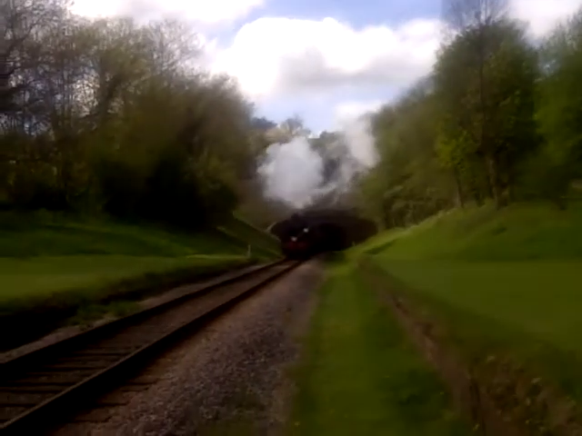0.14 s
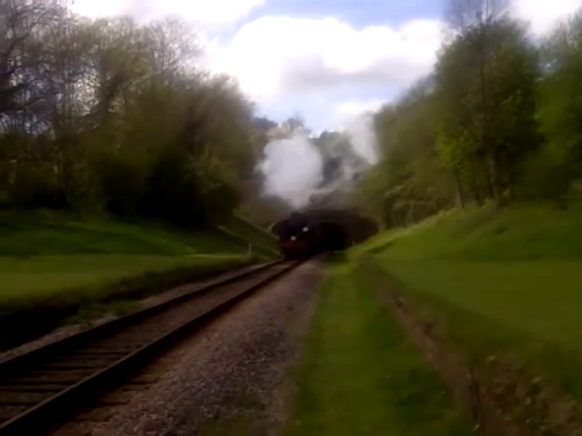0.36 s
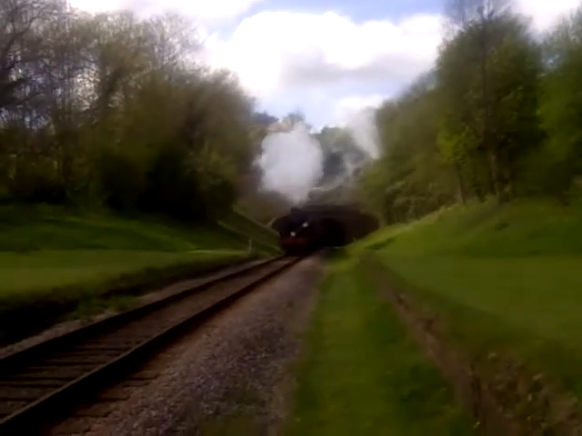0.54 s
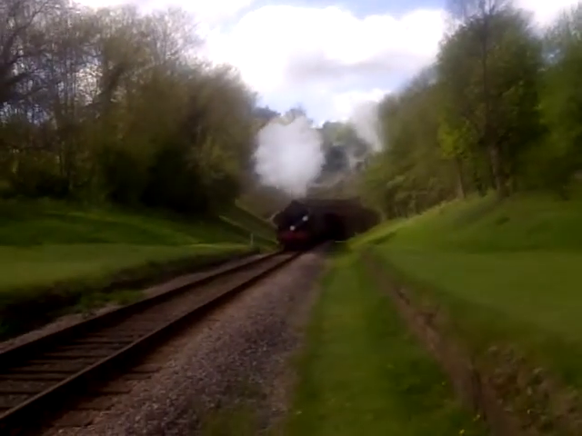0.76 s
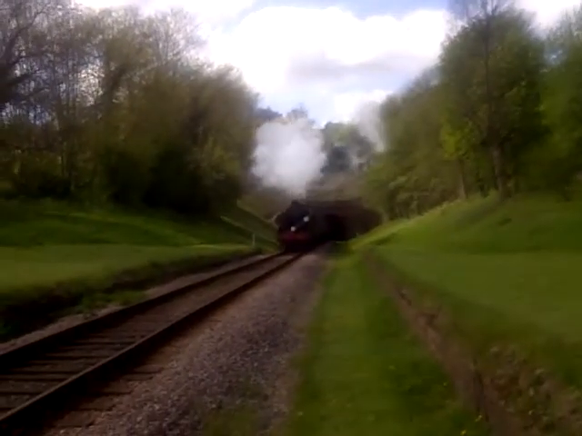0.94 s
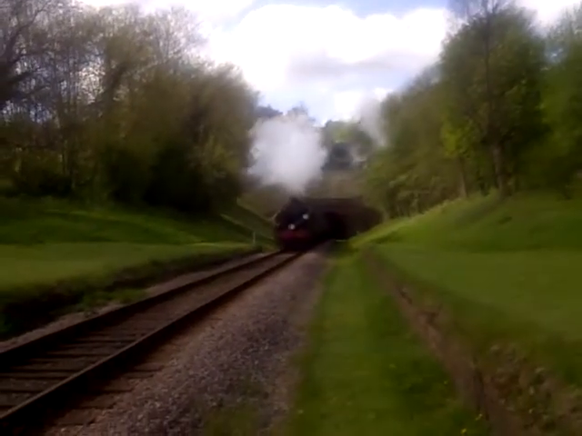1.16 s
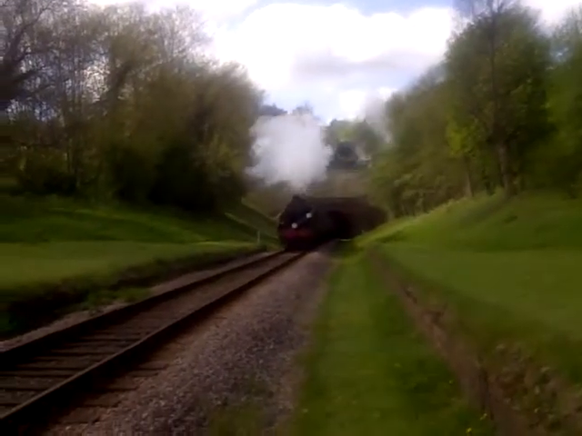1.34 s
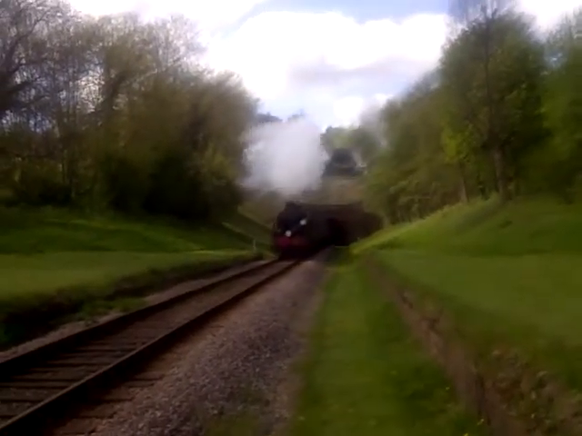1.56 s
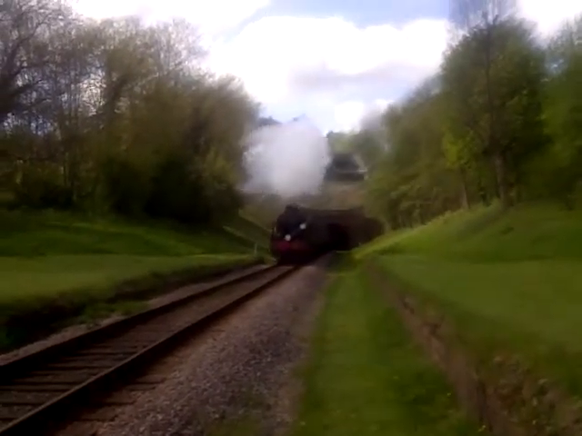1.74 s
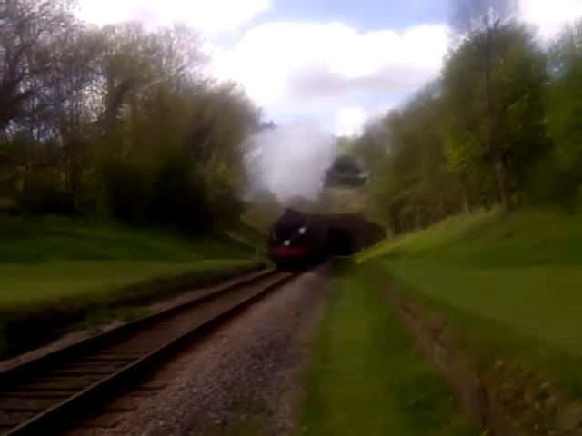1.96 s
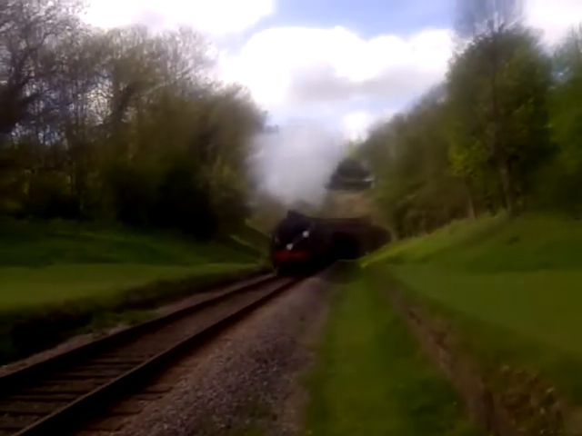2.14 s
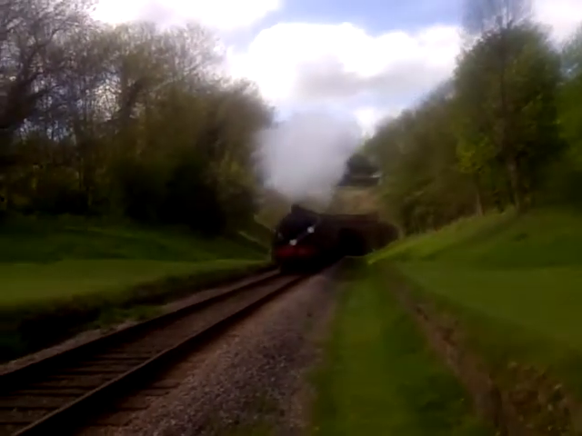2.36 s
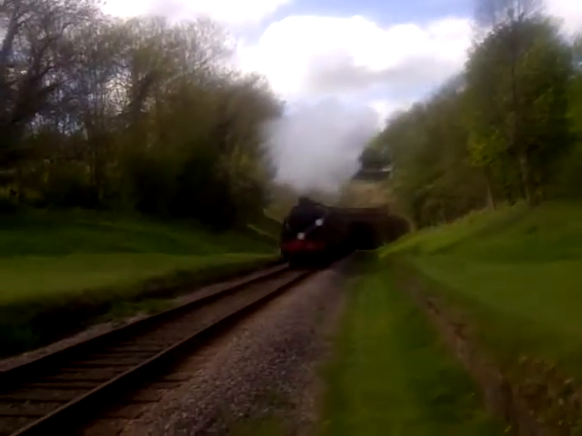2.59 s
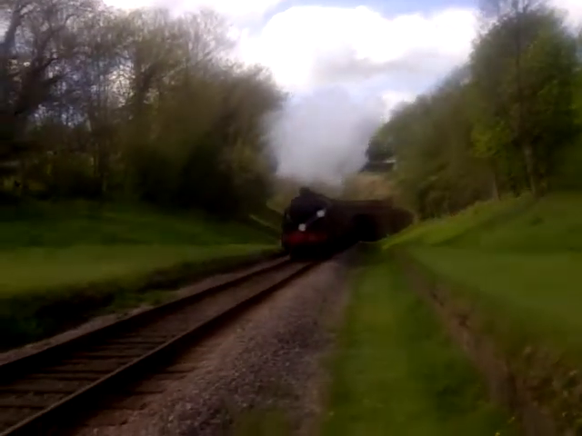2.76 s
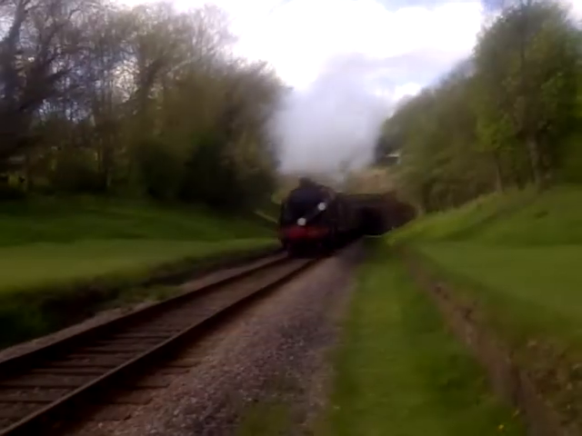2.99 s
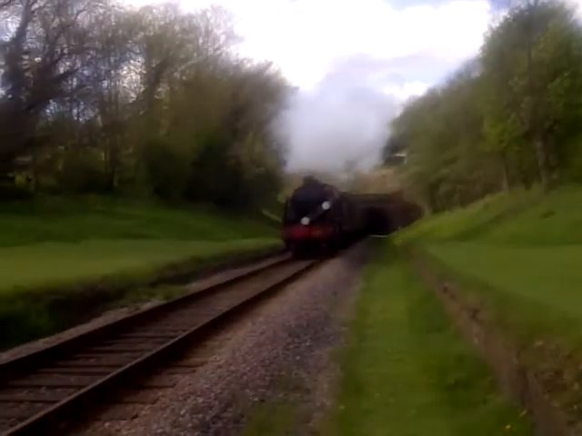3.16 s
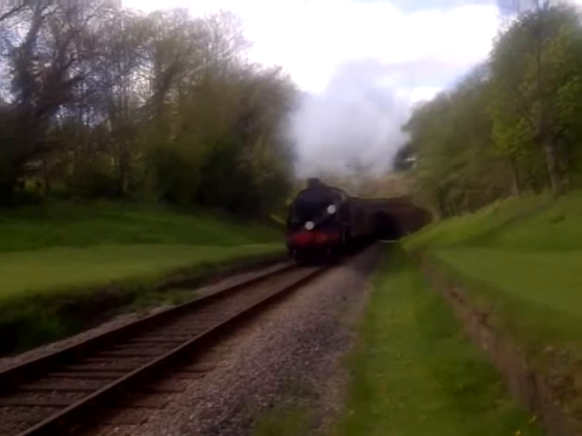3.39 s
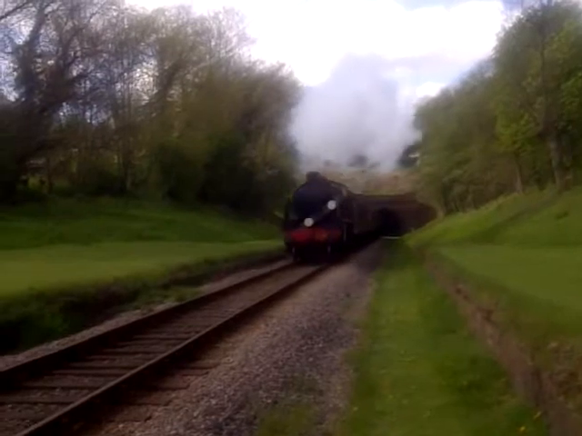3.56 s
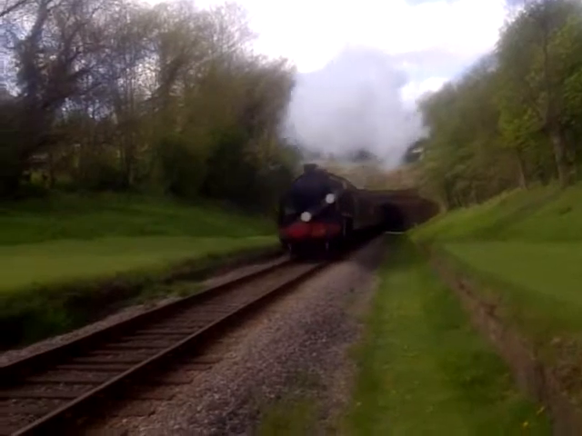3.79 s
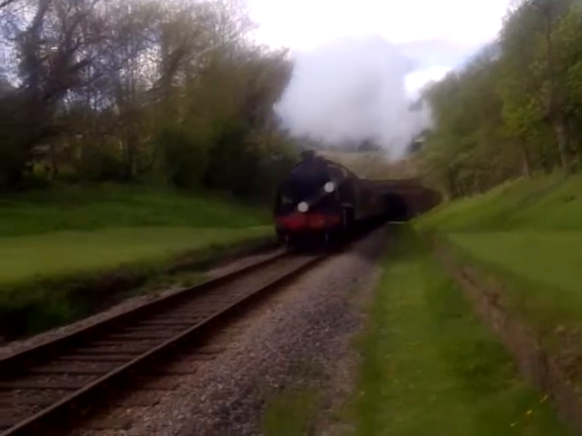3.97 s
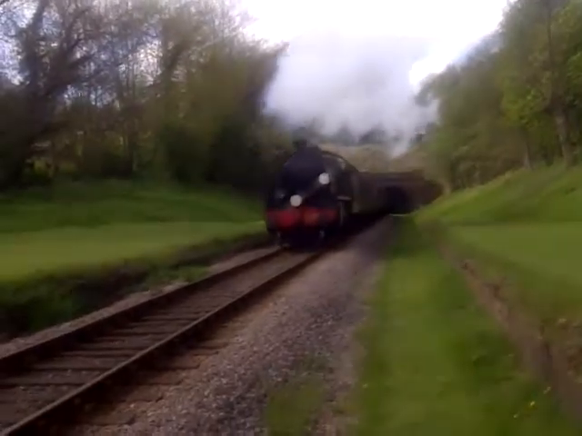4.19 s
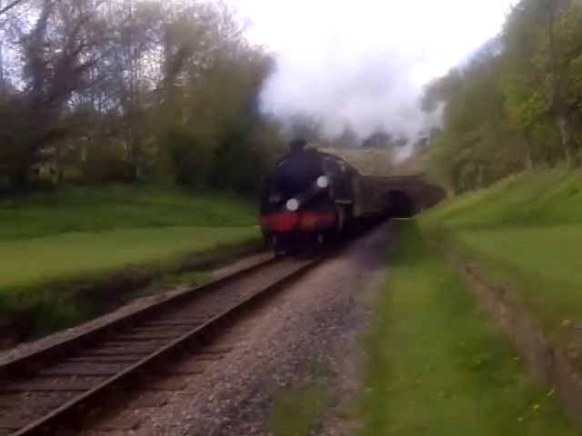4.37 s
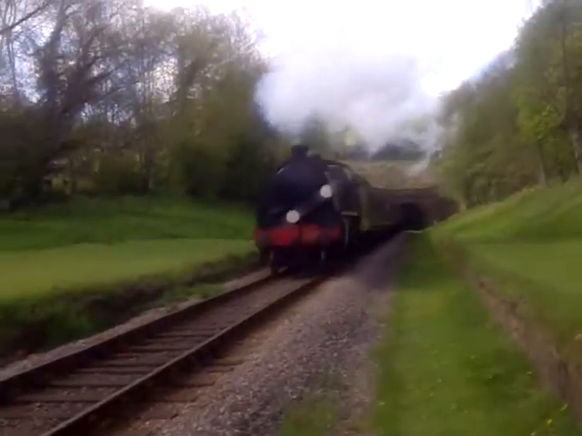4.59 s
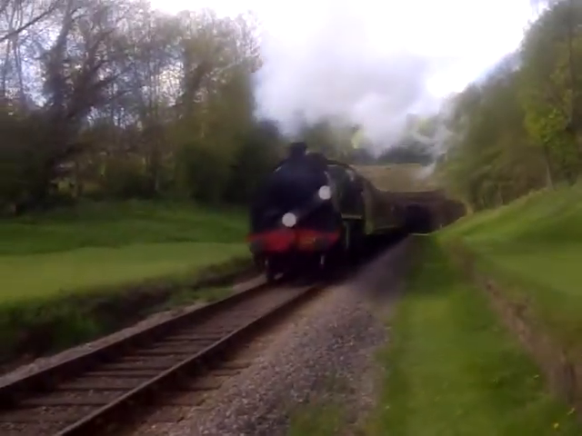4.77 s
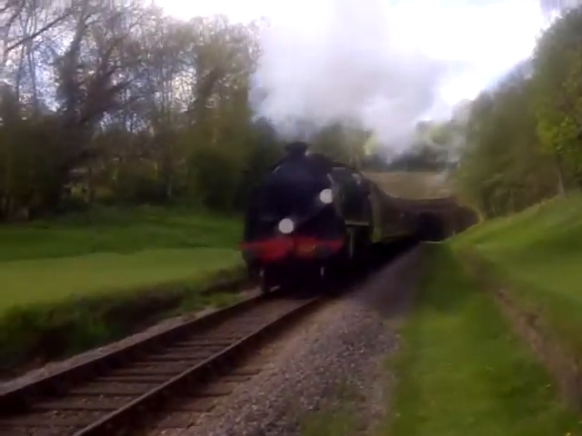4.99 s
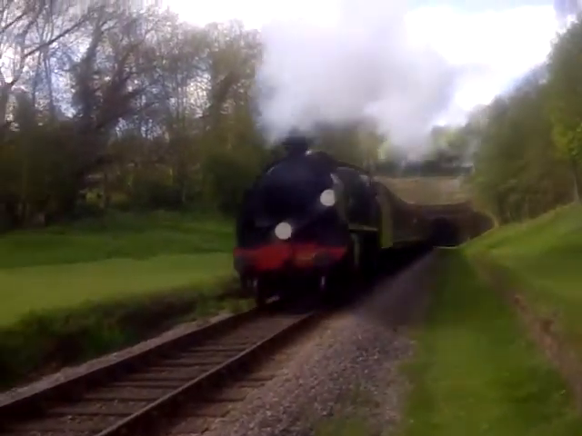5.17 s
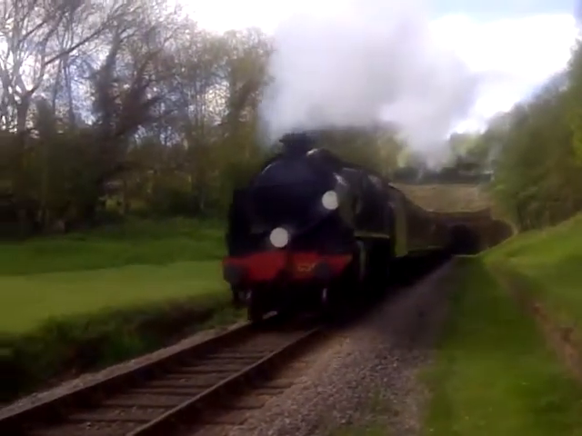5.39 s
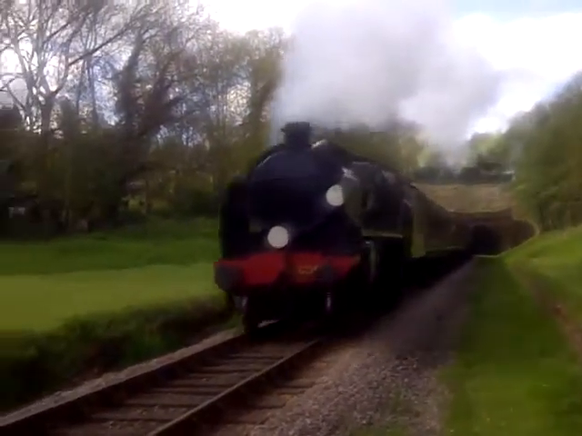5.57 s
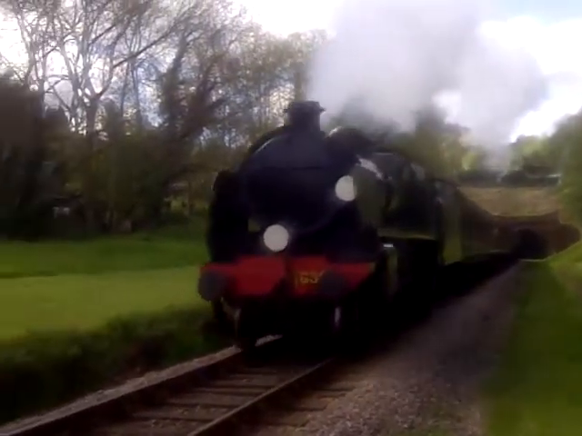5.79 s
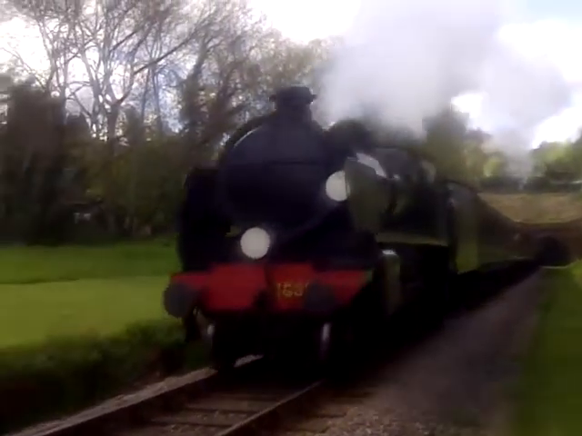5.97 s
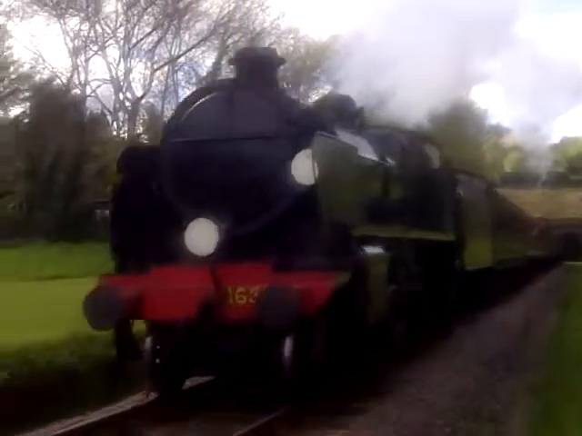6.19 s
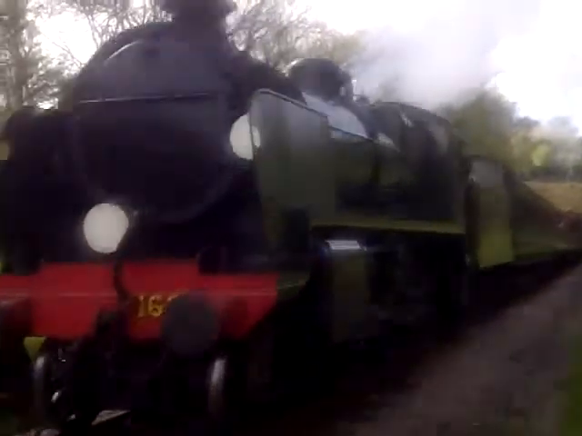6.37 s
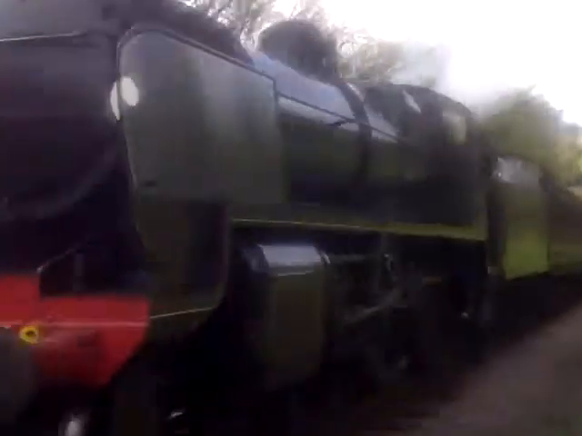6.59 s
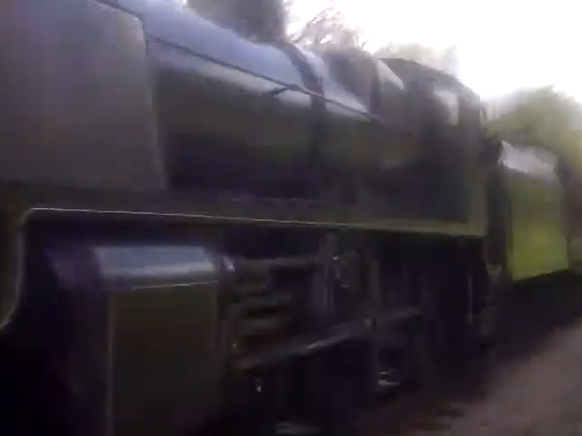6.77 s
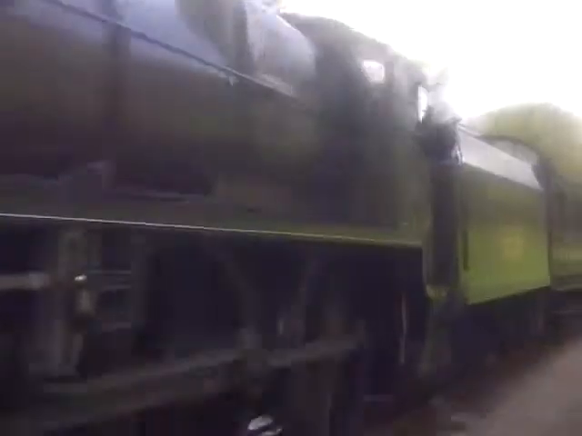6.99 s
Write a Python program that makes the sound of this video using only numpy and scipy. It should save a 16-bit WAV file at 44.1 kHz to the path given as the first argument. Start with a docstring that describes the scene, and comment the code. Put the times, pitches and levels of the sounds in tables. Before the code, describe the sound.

Quick, even steam engine chuffs approach and fade, giving way to metallic knocks, hiss and a rising rumble of wheels.

```python
"""A grassy railway cutting, where a two-cylinder steam locomotive works up toward a trackside listener.
Each exhaust blast, four to a wheel turn, is a turbulent jet that excites the chimney's air column; the
ground and banks reflect it. Steam is shut off and the beats fade. The engine coasts, steel knocking
on steel, and arrives in a swelling roar of wheels and steam. A few small sharp clicks sound close by."""
import sys
import numpy as np
from scipy import signal
from scipy.fft import rfft, irfft, next_fast_len
from scipy.io import wavfile
from scipy.ndimage import uniform_filter1d, map_coordinates

SR = 44100
rng = np.random.default_rng(int(sys.argv[2]) if len(sys.argv) > 2 else 0)


def persist_wave(psi):
    """Save psi, clipped to +-1, as 16-bit WAV."""
    counts = np.round(np.clip(psi, -1, 1) * 32767).astype(np.int16)
    wavfile.write(sys.argv[1], SR, np.atleast_2d(counts).T)


N = 310464


def amp(db):
    """Amplitude ratio of a level in decibels."""
    return 10 ** (np.asarray(db) / 20)


def unit(x):
    """Normalisation to rms 1."""
    return x / np.sqrt(np.mean(x ** 2) + 1e-20)


def along(points, hz):
    """Interpolation of (frequency, value) points on a logarithmic frequency axis."""
    f, v = np.transpose(points)
    return np.interp(np.log(hz + 1), np.log(f + 1), v)


def curves(rows):
    """Linear interpolation in time: one value per sample for each column after the first."""
    times, *columns = np.transpose(rows)
    return [np.interp(np.arange(N) / SR, times, column) for column in columns]


def wobble(rate):
    """Smooth random modulation: a spline through rate Gaussian knots a second."""
    return map_coordinates(rng.standard_normal(int(N * rate / SR) + 4), [np.arange(N) * rate / SR])


def filtered(x, response):
    """Linear filtering: the spectrum of x times a complex frequency response."""
    size = next_fast_len(N + SR // 2)
    return irfft(rfft(x, size) * response(np.fft.rfftfreq(size, 1 / SR)), size)[:N]


def noise(spectrum):
    """Spectral shaping of white noise, normalised to rms 1."""
    return unit(filtered(rng.standard_normal(N), lambda hz: amp(along(spectrum, hz))))


def resonance(f, hz, width):
    """Causal frequency response of one damped mode."""
    return 1j * f * width / (hz * hz - f * f + 1j * f * width)


def swell(t, rise, shape):
    """Gamma envelope: growth to 1 at the rise time, then a near-exponential decay."""
    u = t / rise
    return (u * np.exp(1 - u)) ** shape


def add(track, start_s, sound):
    """Superposition of a sound on a track from a given time."""
    part = track[max(round(start_s * SR), 0):][:len(sound)]
    part += sound[:len(part)]


# relative levels of the rolling train: (time [s], rumble [dB], wheel roar [dB], steam hiss [dB])
ROLLING_LEVELS = [(0.0, -54, -37.5, -60), (0.47, -52.5, -42, -57), (0.86, -48.5, -40, -60),
                  (1.9, -47, -39, -54.5), (3.82, -45, -37, -54.5), (4.38, -43.5, -35.5, -49),
                  (4.6, -45, -35.5, -51.5), (5.06, -45.5, -36, -53.5), (5.15, -45.5, -38, -54),
                  (5.38, -48, -39.5, -55), (5.47, -45.5, -35, -51.5), (5.76, -46.5, -37, -48.5),
                  (5.98, -44, -32, -49.5), (6.27, -44, -30.5, -46.5), (6.44, -42, -27.5, -45),
                  (6.63, -44, -27.5, -40.5), (6.7, -44, -22, -39.5), (6.75, -38, -31, -37),
                  (6.79, -42, -23, -38.5), (7.0, -43, -22, -37)]
# spectra of far and near wheels, rumble, steam, fine spray and fizz: (frequency [Hz], relative level [dB])
WHEELS_FAR = [(100, -30.5), (210, 10), (300, -1.5), (400, 5.5), (520, 0.5), (700, 0.5), (850, 4.5),
              (1120, 0), (1320, 3), (1700, -1), (2400, -9.5), (3200, -27), (8000, -65.5)]
WHEELS_NEAR = [(80, -29.5), (140, -1), (240, -1), (450, 1), (700, -2), (950, -5.5), (1130, -6.5),
               (1350, -8), (1700, -8.5), (2400, -12), (3200, -32.5), (8000, -60)]
RUMBLE_SPECTRUM = [(15, -22.5), (30, -9.5), (65, -1), (90, -2.5), (130, 1.5), (200, -0.5), (300, -7),
                   (600, -63.5), (2000, -120)]
STEAM_SPECTRUM = [(1500, -36.5), (2500, 9.5), (3100, 10.5), (3800, 5), (4400, 3), (5300, -3), (6200, -15),
                  (7000, -38.5), (8000, -69)]
SPRAY_SPECTRUM = [(3500, -22.5), (5500, 2.5), (6800, -1), (7400, -24), (8000, -44.5)]
FIZZ_SPECTRUM = [(2500, -26), (4200, 6), (6000, -4.5), (7200, -20)]
def rolling(arrival_s=6.37, spread_s=0.45):
    """Broadband rolling and steam noise: close up the roar fills out, steel rings and fine hiss arrives."""
    rumble_db, roar_db, hiss_db = curves(ROLLING_LEVELS)
    near = 0.038 + 0.87 / (1 + np.exp((arrival_s - np.arange(N) / SR) / spread_s))
    ring = amp(-13.5 + 10 * near) * unit(steel_modes(rng.standard_normal(N)))
    wheels = np.sqrt(1 - near) * noise(WHEELS_FAR) + np.sqrt(near) * noise(WHEELS_NEAR) + ring
    roar = amp(roar_db - 0.5 + 0.87 * wobble(45)) * wheels
    rumble = amp(rumble_db + 7 + 2.1 * wobble(9.2)) * noise(RUMBLE_SPECTRUM)
    hiss_gain = amp(hiss_db - 0.4 + 1.4 * wobble(25))
    steam = noise(STEAM_SPECTRUM) + amp(-10) * near ** 2 * noise(SPRAY_SPECTRUM)
    fizz = amp(-73 + 4.5 * wobble(30)) * noise(FIZZ_SPECTRUM)  # flickers out of step with the beats
    return roar + rumble + hiss_gain * steam + fizz


# modes of wheels and rails: (frequency [Hz], bandwidth of each resonator [Hz], gain [dB])
STEEL_MODES = [(420, 130, -11.5), (588, 49, -0.5), (953, 110, -2.5), (1293, 99, 1), (1337, 67, 0.5),
               (1460, 84, -3.5), (2152, 52, -4.5), (2570, 7.8, -11.5), (3355, 55, -23.5), (3590, 50, -25.5),
               (4350, 39, -16.5), (5440, 27, -22.5)]
def steel_modes(force):
    """Forced vibration of wheels and rails: a sum of modes, each two resonators in cascade."""
    def response(f):
        return sum(amp(db) * resonance(f, hz, width) ** 2 for hz, width, db in STEEL_MODES)
    return filtered(force, response)


# exhaust beats, the last ones fading as steam is shut off:
# (time [s], rise time [s], bark level [dB], boom level [dB], boom frequency [Hz])
EXHAUST_BEATS = [(.058, .026, -36.5, -49, 217), (.186, 0.019, -31, -48, 192.4),
                 (.324, 0.021, -33.5, -47, 187), (.442, .025, -34, -34.5, 229.5),
                 (.56, .018, -33.5, -34.5, 216.4), (.677, 0.026, -30.5, -36.5, 217),
                 (.818, 0.024, -34, -33.5, 200.4), (.935, 0.025, -33, -34.5, 213),
                 (1.05, 0.024, -34, -41, 243), (1.172, .018, -31, -39.5, 229.5),
                 (1.308, 0.022, -32, -32.5, 223), (1.422, 0.029, -35.5, -35, 211.5),
                 (1.54, 0.026, -36, -46, 210), (1.657, 0.029, -31.5, -31, 211.5),
                 (1.793, 0.023, -31.5, -33.5, 218), (1.917, 0.021, -31, -31.5, 207),
                 (2.03, 0.02, -34.5, -31.5, 223), (2.151, .011, -26.5, -29, 226),
                 (2.281, 0.026, -32.5, -33, 218), (2.407, 0.023, -31.5, -31.5, 238.6),
                 (2.52, 0.021, -33, -29.5, 206.5), (2.636, .019, -27.5, -24, 204.5),
                 (2.772, 0.016, -29.5, -28, 208), (2.887, .027, -30.5, -33, 189),
                 (2.998, .027, -33.5, -31, 215), (3.12, 0.022, -28, -33, 218),
                 (3.261, .017, -29.5, -35, 214), (3.372, 0.023, -30, -38, 229),
                 (3.481, 0.032, -34.5, -31, 212), (3.605, 0.024, -27.5, -28.5, 218.4),
                 (3.735, 0.026, -31, -34.5, 220), (3.852, .028, -31.5, -28, 207.6),
                 (3.966, .025, -33, -32.5, 207), (4.088, 0.017, -29, -23, 201),
                 (4.214, 0.028, -33, -45, 204), (4.336, 0.023, -31.5, -35.5, 212),
                 (4.448, 0.028, -33, -32.5, 196), (4.568, 0.014, -30, -24.5, 208.7),
                 (4.696, 0.019, -34.5, -42, 242), (4.818, 0.016, -39, -32, 199),
                 (4.93, 0.045, -43.5, -47, 184)]
# the bark grows rounder as the engine nears: (time [s], power share of the near spectrum [0-1])
BARK_NEARNESS = [(1.2, 0.02), (4.0, 1)]
# spectra of far and near bark, wet steam and low puff: (frequency [Hz], relative level [dB])
BARK_FAR = [(150, -30), (270, 3.5), (350, -6), (420, 0.5), (500, -5), (610, -13.5), (720, -5.5), (810, 2.5),
            (950, -1), (1090, -4.5), (1260, 3.5), (1450, -1), (1750, -3), (2350, -10.5), (2600, -29),
            (3500, -34), (7500, -73)]
BARK_NEAR = [(150, -29), (270, 1.5), (380, 0.5), (500, -12.5), (610, -1), (720, -13), (830, 0.5),
             (950, -2.5), (1100, -8), (1260, -1.5), (1420, -3), (1700, -9), (1950, -11.5), (2600, -20),
             (3500, -32), (7500, -75)]
SIZZLE_SPECTRUM = [(1800, -26.5), (2800, 2.5), (3700, 0), (4050, 3), (4400, -4.5), (5000, -6.5),
                   (6200, -14.5), (7500, -36.5)]
PUFF_SPECTRUM = [(50, -21.5), (120, -6.5), (200, 2.5), (280, -5), (370, 0.5), (450, -7.5), (530, -9.5),
                 (900, -54), (3000, -120)]
def exhaust(decay_s=0.016, sizzle_db=-23):
    """Pulsed jet noise: each valve opening sends a blast up the chimney, whose air column resonates."""
    t = np.arange(SR // 4) / SR
    blast, column, ring, spit = np.zeros((4, N))
    scatter = rng.standard_normal((len(EXHAUST_BEATS), 2))
    for (start_s, rise, bark_db, boom_db, boom_hz), (phase, wetness_db) in zip(EXHAUST_BEATS, scatter):
        push = amp(bark_db) * swell(t, rise, shape=rise / decay_s)  # all blasts share one decay rate
        add(blast, start_s, push)
        add(spit, start_s, amp(sizzle_db + wetness_db) * push)
        low_mode = np.sin(2 * np.pi * (boom_hz * t + phase))
        add(column, start_s, amp(boom_db) * swell(t, rise=0.027, shape=1.23) * low_mode)
        add(ring, start_s, push * chimney_modes(t))
    near = curves(BARK_NEARNESS)[0]
    jet = np.sqrt(1 - near) * noise(BARK_FAR) + np.sqrt(near) * noise(BARK_NEAR)
    ragged_jet = amp(0.63 + 0.58 * wobble(260)) * blast * jet
    bark = ragged_jet + amp(-0.73) * ring + spit * noise(SIZZLE_SPECTRUM)
    # turbulence roughens the boom and scatters part of it into a wider puff, stronger as the engine nears
    boom = amp(0.9 + 3.4 * wobble(90)) * column
    puff_db = curves([(0, -5.5), (3.5, 0.5), (4.6, 5.5)])[0]
    puff = amp(puff_db) * blast * noise(PUFF_SPECTRUM)
    return ground_reflection(bark) + boom + puff


# upper resonances of the chimney: (frequency [Hz], relative level [dB])
CHIMNEY_MODES = [(370, -5.5), (590, -11.5), (795, -7), (868, -7.5), (970, -10.5), (1260, -7), (1400, -8.5),
                 (1650, -12.5), (2230, -16)]
def chimney_modes(t):
    """Pipe resonance: gas temperature shifts the modes at each beat, and turbulence broadens them."""
    ring = np.zeros(len(t))
    for (hz, db), (shift, strength) in zip(CHIMNEY_MODES, rng.standard_normal((len(CHIMNEY_MODES), 2))):
        shifted_hz = hz * np.exp(0.03474 * shift)
        phase_drift = 0.051 * np.cumsum(uniform_filter1d(rng.standard_normal(len(t)), size=90))
        ring += amp(db + 2.9 * strength) * np.sin(2 * np.pi * shifted_hz * t + phase_drift)
    return ring


def ground_reflection(x, start_m=46.9, speed_m_per_s=6, chimney_m=3.95, listener_m=1.375, share=0.29):
    """Comb filtering: the ground bounce lags more as the chimney nears, so the notches sweep down."""
    n = np.arange(N)
    distance_m = start_m - speed_m_per_s * n / SR
    detour_m = np.hypot(distance_m, chimney_m + listener_m) - np.hypot(distance_m, chimney_m - listener_m)
    bounce = map_coordinates(x, [n - SR * detour_m / 343], order=1)  # sound travels at 343 m/s
    return (x + share * bounce) / np.hypot(1, share)


# reverberation of the cutting: (frequency [Hz], time to decay by 60 dB [s])
CUTTING_T60 = [(150, 0.22), (1000, 0.57), (6000, 0.2)]
def cutting_reverberation(x):
    """Diffuse scattering: banks and trees return a short decaying tail after 20 ms."""
    hz, t, spectra = signal.stft(rng.standard_normal(SR // 2), SR, nperseg=256)
    decay = amp(-60 * t / along(CUTTING_T60, hz)[:, None])
    tail = signal.istft(spectra * decay, SR, nperseg=256)[1]
    delayed = np.pad(x, (SR // 50, 0))
    return signal.fftconvolve(delayed, tail / np.linalg.norm(tail))[:N]


# the clearest clicks: (time [s], relative snap level [dB], relative tail level [dB], frequency [Hz])
CLOSE_CLICKS = [(0.088, -8.5, -9, 4200), (0.27, -21, -19.5, 1310), (0.316, -15, -20, 1300),
                (0.343, -9, -33, 1250), (0.621, -35, -25, 2000), (0.642, -24, -28, 1150),
                (1.009, -31, -40, 5000), (1.53, -20.5, -27, 3870), (1.535, -24, -26, 3480),
                (1.548, -37, -27, 2500), (2.128, -35, -26, 1110), (2.511, -19.5, -20, 2000),
                (2.734, -13, -27, 1410), (3.075, -27, -29, 2960), (3.358, -18.5, -21.5, 2480),
                (3.771, -17, -20, 2900), (5.617, -25, -27, 4050)]
# spectrum of their gritty tails: (frequency [Hz], relative level [dB])
GRIT_SPECTRUM = [(200, -10.5), (700, -1), (1200, 19.5), (2400, 1.5), (4300, -3.5), (6000, -14.5),
                 (7000, -48.5), (8000, -79)]
def clicks():
    """Impulsive transients: a snap of about one cycle, hence broad in band, with a short noise tail."""
    t = np.arange(SR // 20) / SR
    snaps, tails = np.zeros((2, N))
    for start_s, snap_db, tail_db, hz in CLOSE_CLICKS + ticks():
        snap = np.sin(2 * np.pi * hz * t) * swell(t, rise=0.78 / hz, shape=2.5)
        add(snaps, start_s, amp(snap_db) * snap)
        add(tails, start_s, amp(tail_db) * swell(t, rise=0.00079, shape=0.6))
    return amp(-7) * (snaps + tails * noise(GRIT_SPECTRUM))


def ticks(count=9, until_s=2.2, hz=1300, spread_octaves=0.22):
    """A random point process: fainter clicks, as rows with the columns of CLOSE_CLICKS."""
    return [(until_s * rng.random(), rng.normal(-31, 2), -34, hz * 2 ** rng.normal(0, spread_octaves))
            for _ in range(count)]


# knocks of wheels and running gear:
# (time [s], thump level [dB], relative clank level [dB], thump frequency [Hz], ping level [dB])
GEAR_KNOCKS = [(4.544, -18.5, -20.5, 260, -57), (4.583, -18.5, -18.5, 230, -52),
               (4.782, -20.5, -21.5, 290, -55), (4.985, -21, -23.5, 335, -55.5),
               (5.194, -18, -45, 316, -57), (5.207, -26, -28, 240, -57), (5.494, -20, -31, 320, -59),
               (5.675, -25.5, -31, 304, -57), (5.847, -20.5, -41, 302, -55), (6.103, -23, -14.5, 252, -35),
               (6.114, -7.5, -23, 212, -34), (6.357, -12, -14.5, 260, -31), (6.43, -21, -21, 332, -37),
               (6.503, -18.5, -34, 300, -51), (6.557, -16, -16.5, 298, -31), (6.574, -23, -21, 330, -48),
               (6.592, -17, -19.5, 280, -46), (6.712, -26, -19.5, 285, -42), (6.725, -20, -20, 400, -45),
               (6.762, -23, -13.5, 324, -38), (6.781, -39, -20.5, 400, -44), (6.825, -16, -19.5, 485, -42),
               (6.906, -14, -9, 468, -32), (6.916, -16, -27, 454, -36), (6.925, -26, -33, 410, -48),
               (6.934, -15, -24, 420, -47), (6.956, -20, -27, 300, -44)]
# high modes of a wheel struck on its edge: (frequency [Hz], relative level [dB], 60 dB decay time [s])
PING_MODES = [(2640, -11, .06), (2930, -5.5, 0.037), (3160, -16.5, .08), (3360, 2.5, 0.039),
              (3630, -7.5, 0.068), (4350, -9.5, .04)]
# spectra of clank, steel-on-steel force and ground shudder: (frequency [Hz], relative level [dB])
CLANK_SPECTRUM = [(150, -8.5), (290, 13), (480, 11.5), (900, 4), (1500, 6), (2200, -4.5), (3500, -20),
                  (6000, -27.5), (8000, -70.5)]
CONTACT_SPECTRUM = [(400, -4), (900, 9.5), (2500, -7), (3450, 9.5), (4500, -2.5), (8000, -31.5)]
SHUDDER_SPECTRUM = [(50, -18.5), (110, -5.5), (190, 4), (300, -5), (600, -33.5), (2000, -100)]
def knocks():
    """Impact excitation: heavy steel parts meet with a thump and a clank; wheels ring, the ground shakes."""
    t = np.arange(SR // 5) / SR
    thumps, shudders, blows, pings = np.zeros((4, N))
    ping_phases = rng.random((len(GEAR_KNOCKS), len(PING_MODES)))
    for (start_s, thump_db, clank_db, thump_hz, ping_db), phases in zip(GEAR_KNOCKS, ping_phases):
        thump = -np.sin(2 * np.pi * thump_hz * t) * swell(t, rise=0.0025, shape=1.76)
        add(thumps, start_s, amp(thump_db) * thump)
        add(shudders, start_s, amp(thump_db - 20) * swell(t, rise=0.017, shape=0.75))
        add(blows, start_s, amp(clank_db) * swell(t, rise=0.0037, shape=0.37))
        modes = sum(amp(db - 60 * t / t60) * np.sin(2 * np.pi * (hz * t + phase))
                    for (hz, db, t60), phase in zip(PING_MODES, phases))
        attack = 1 - np.exp(-t / 0.0012)
        add(pings, start_s, amp(ping_db) * attack * modes)
    clanks = amp(-7) * blows * noise(CLANK_SPECTRUM) + steel_modes(blows * noise(CONTACT_SPECTRUM))
    return thumps + shudders * noise(SHUDDER_SPECTRUM) + clanks + pings


# hum of the engine's body as it draws level: (time [s], level [dB])
DRONE_LEVELS = [(6.0, -91.5), (6.5, -51), (6.82, -42), (6.89, -34), (6.93, -40), (6.99, -35), (7.04, -16.5)]
def body_drone(centre_hz=142.2, wander=0.0475):
    """Structural vibration heard close up: a low tone, randomly modulated in frequency and amplitude."""
    pitch_hz = centre_hz * np.exp(wander * wobble(40))
    tone = unit(np.sin(2 * np.pi * np.cumsum(pitch_hz) / SR))
    return amp(curves(DRONE_LEVELS)[0] + 0.85 * wobble(30)) * tone


def scene():
    """Superposition of all sources in one channel; only the exhaust and knocks reverberate."""
    engine = exhaust() + knocks()
    reverberation = amp(-14) * cutting_reverberation(engine)
    return (engine + reverberation + rolling() + body_drone() + clicks())[None]


def record(dry, cutoff_hz=7400):
    """Band limiting: a steep zero-phase low-pass removes the top treble."""
    return np.array([filtered(x, lambda hz: 1 / np.sqrt(1 + (hz / cutoff_hz) ** 120)) for x in dry])


dry = scene()
out = record(dry)
persist_wave(out)
```